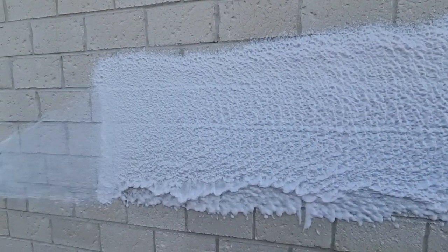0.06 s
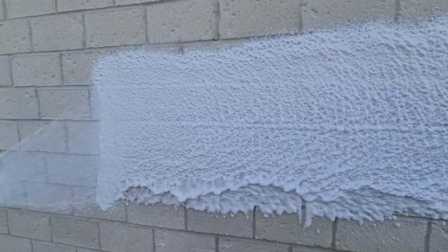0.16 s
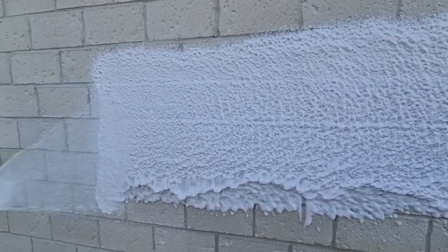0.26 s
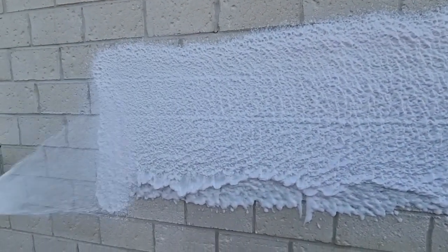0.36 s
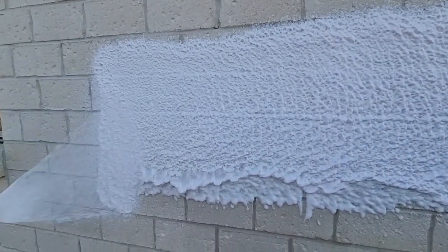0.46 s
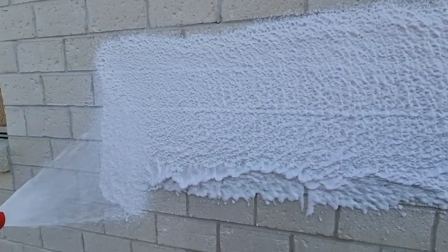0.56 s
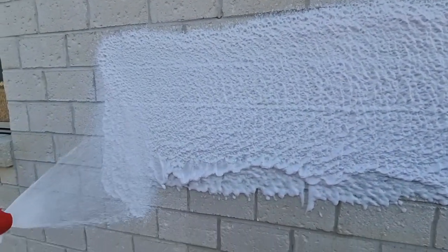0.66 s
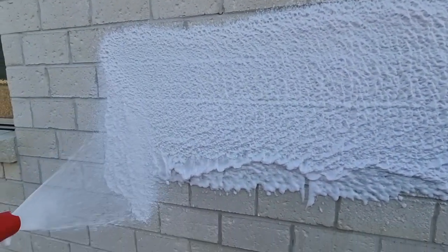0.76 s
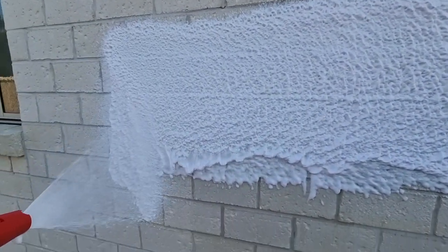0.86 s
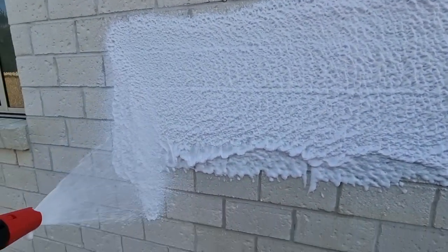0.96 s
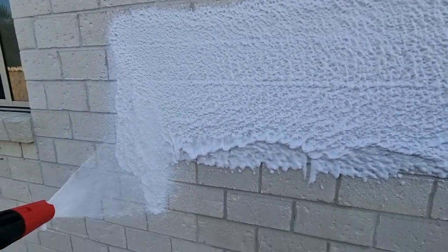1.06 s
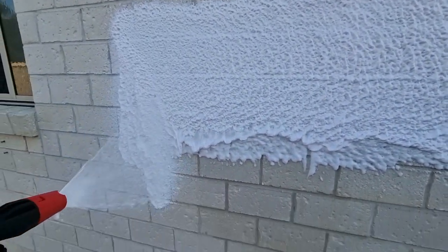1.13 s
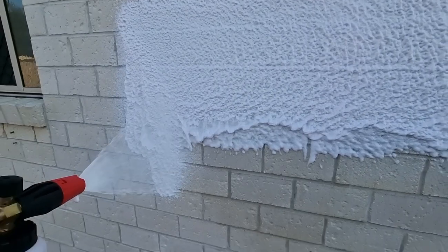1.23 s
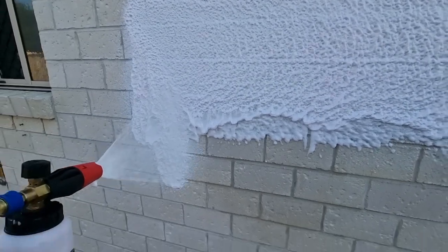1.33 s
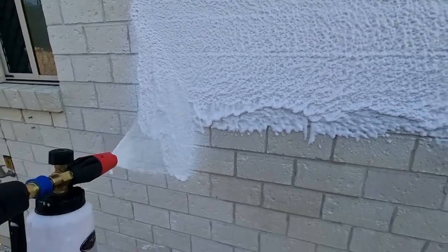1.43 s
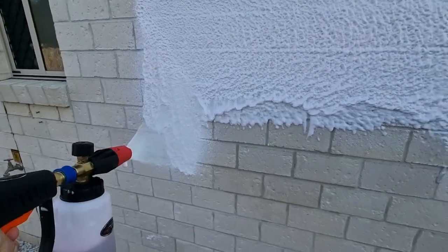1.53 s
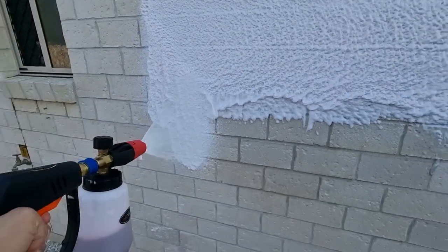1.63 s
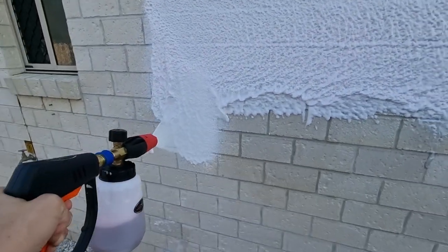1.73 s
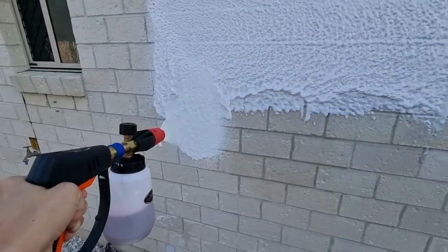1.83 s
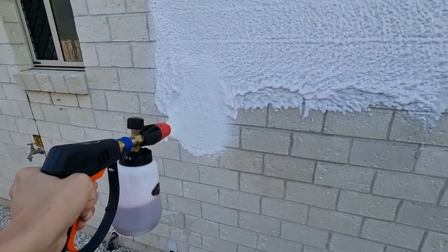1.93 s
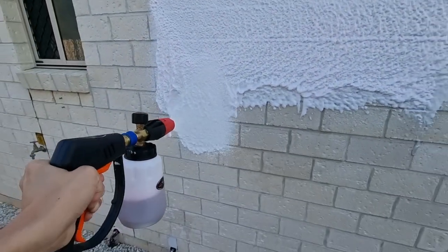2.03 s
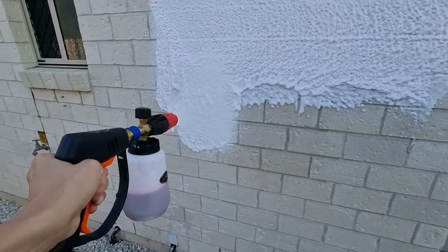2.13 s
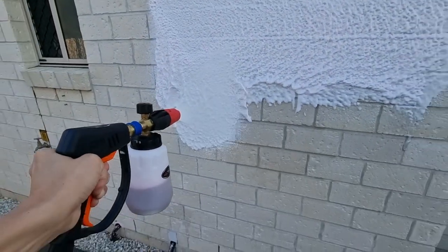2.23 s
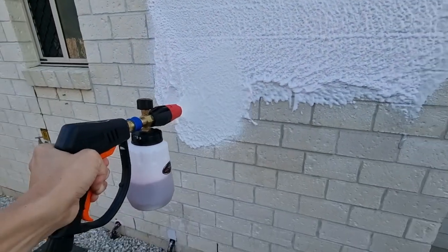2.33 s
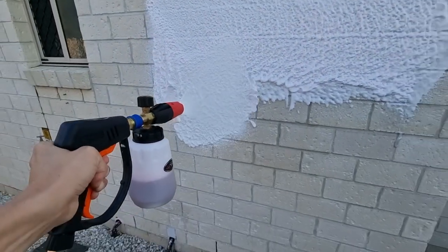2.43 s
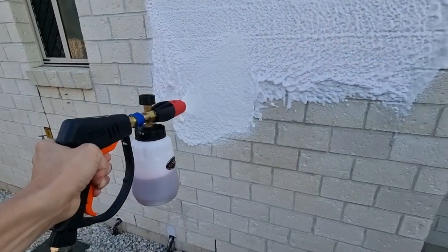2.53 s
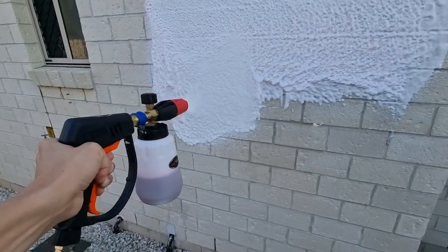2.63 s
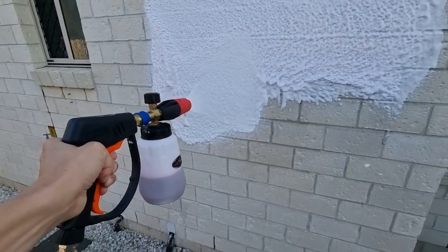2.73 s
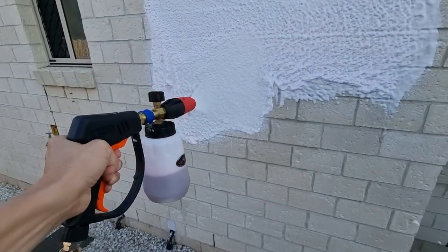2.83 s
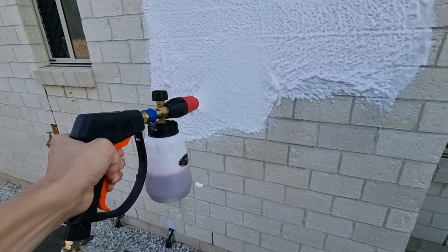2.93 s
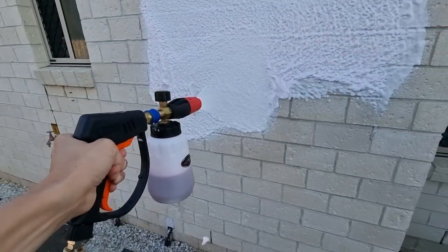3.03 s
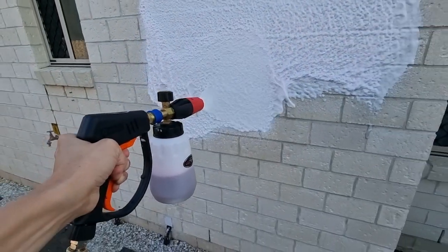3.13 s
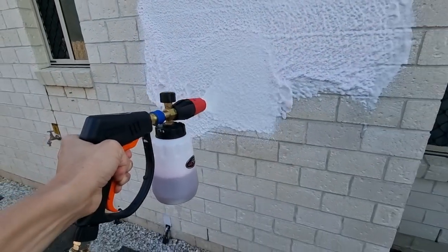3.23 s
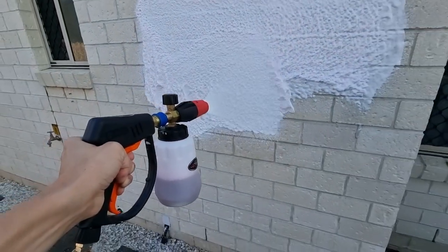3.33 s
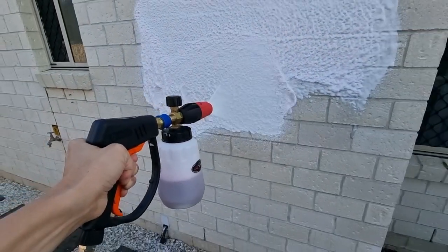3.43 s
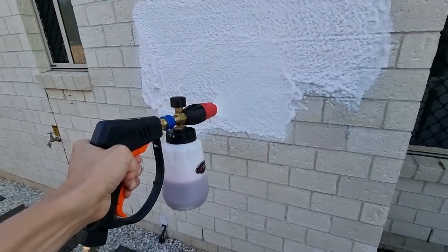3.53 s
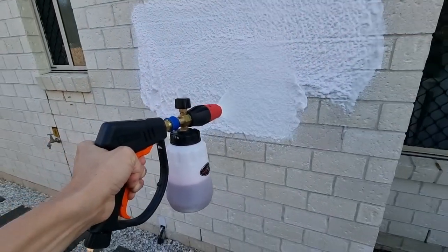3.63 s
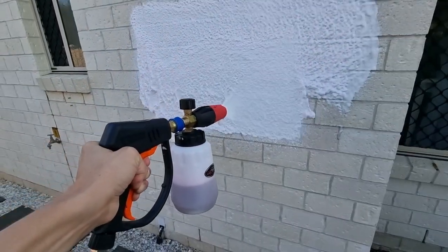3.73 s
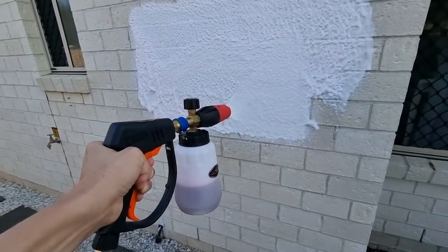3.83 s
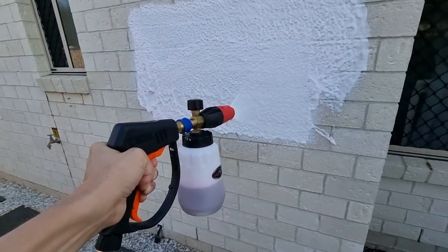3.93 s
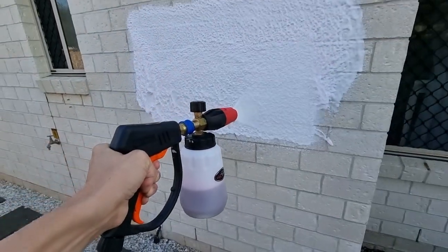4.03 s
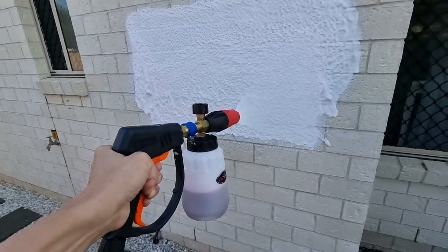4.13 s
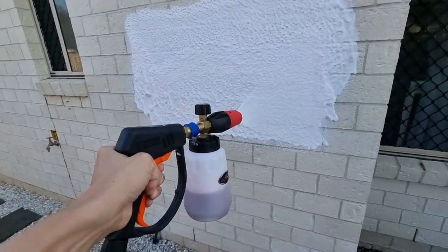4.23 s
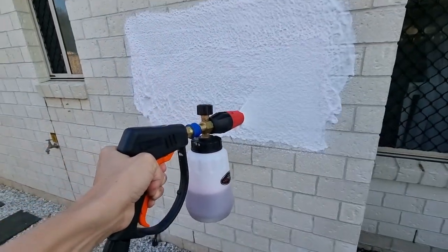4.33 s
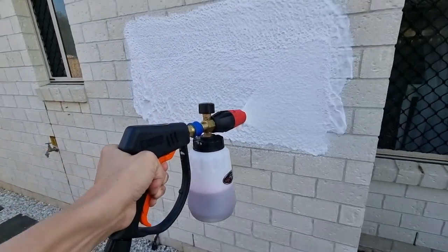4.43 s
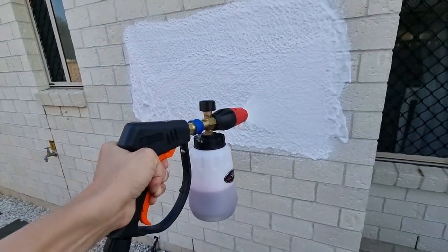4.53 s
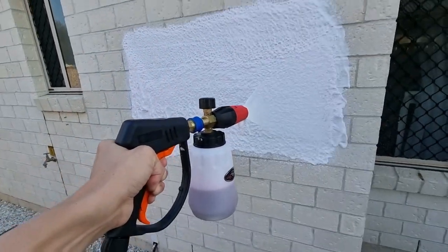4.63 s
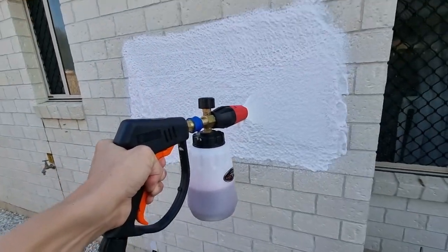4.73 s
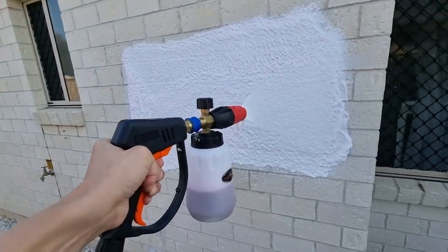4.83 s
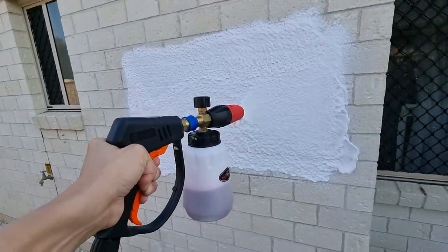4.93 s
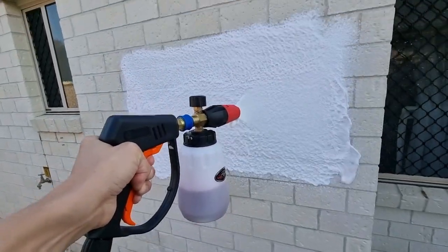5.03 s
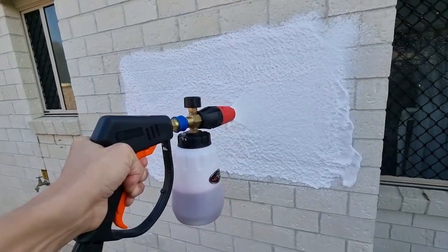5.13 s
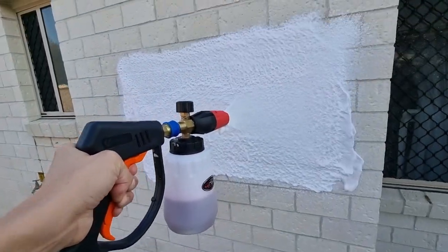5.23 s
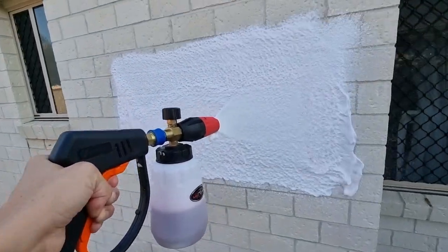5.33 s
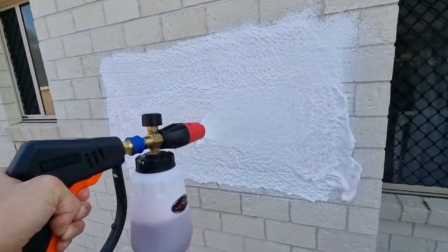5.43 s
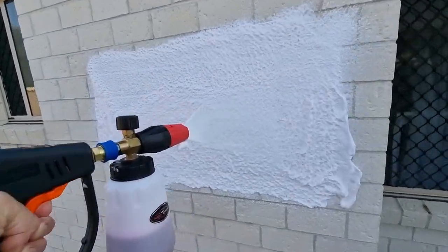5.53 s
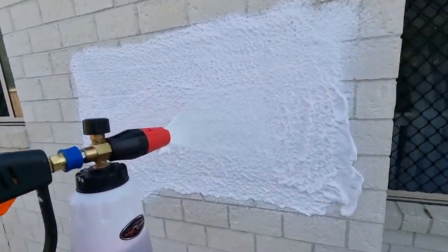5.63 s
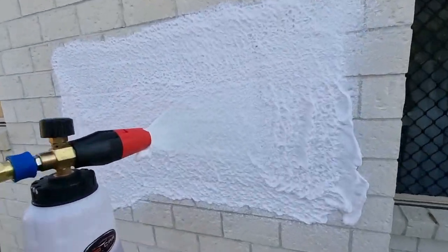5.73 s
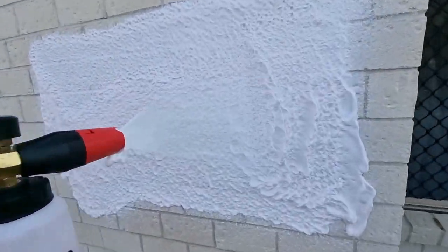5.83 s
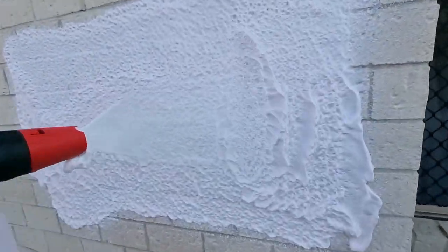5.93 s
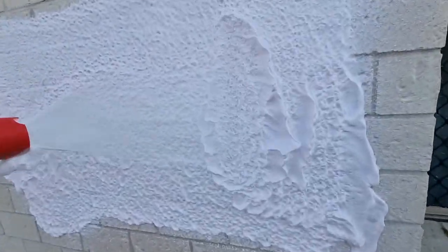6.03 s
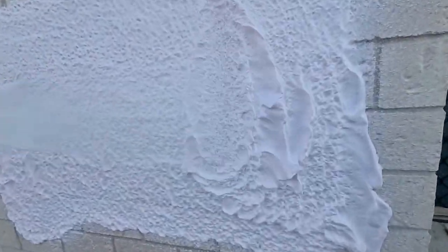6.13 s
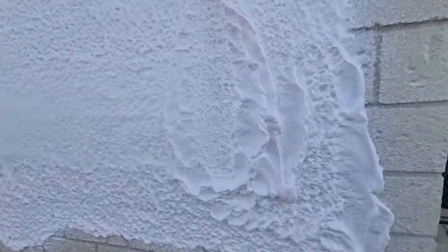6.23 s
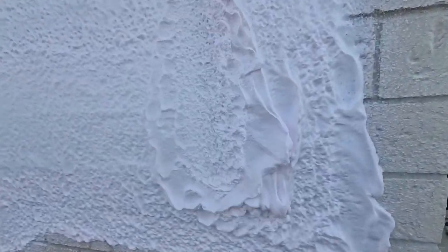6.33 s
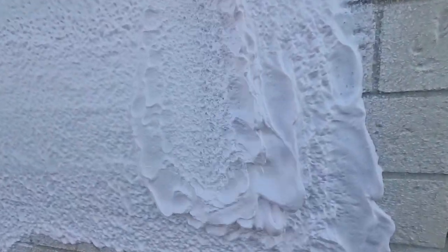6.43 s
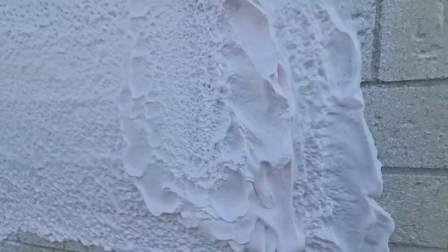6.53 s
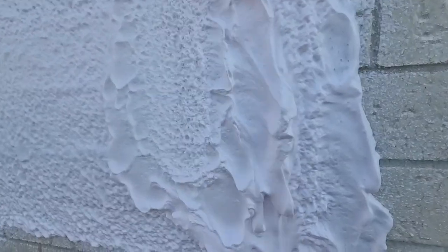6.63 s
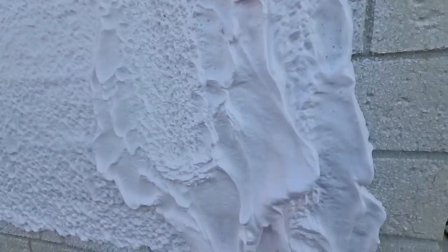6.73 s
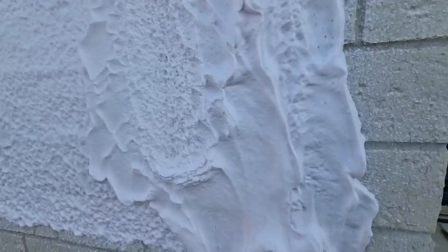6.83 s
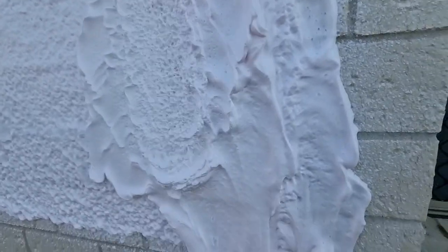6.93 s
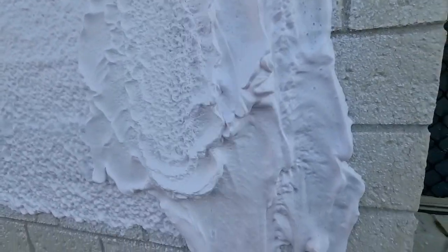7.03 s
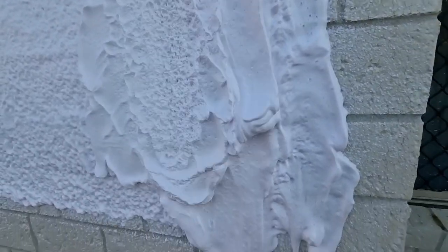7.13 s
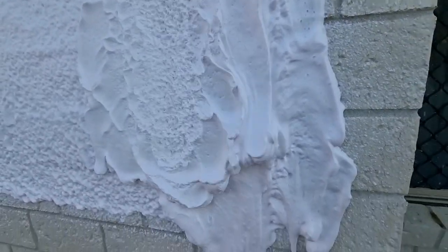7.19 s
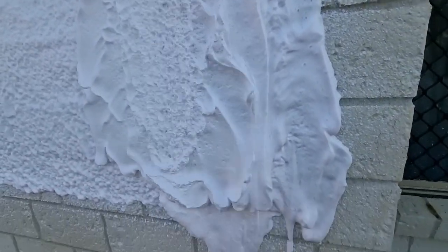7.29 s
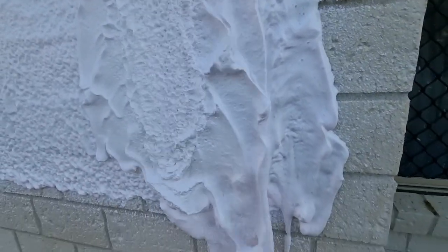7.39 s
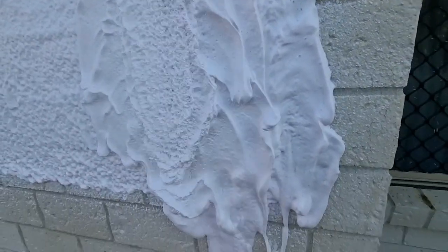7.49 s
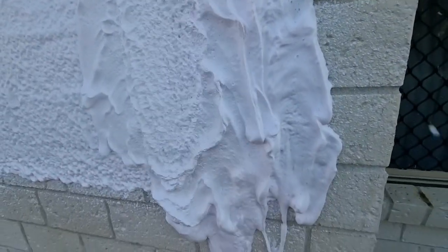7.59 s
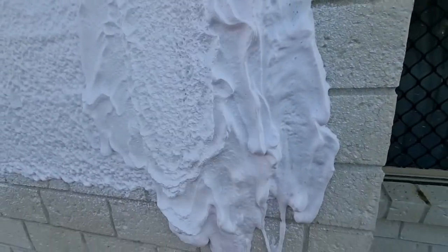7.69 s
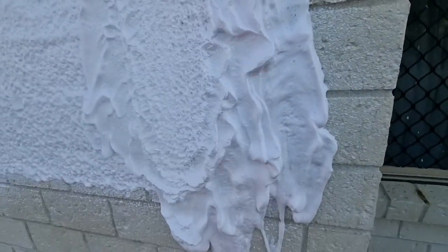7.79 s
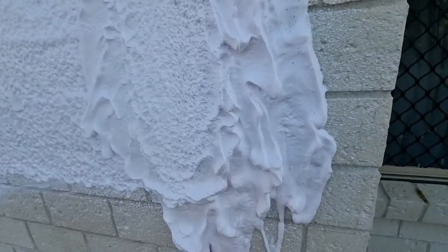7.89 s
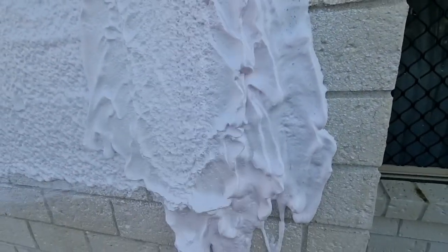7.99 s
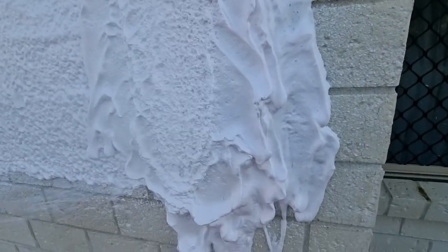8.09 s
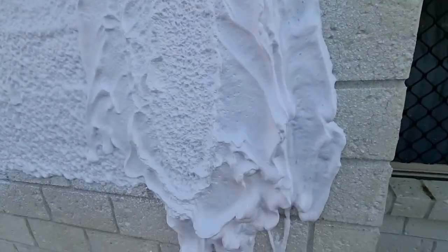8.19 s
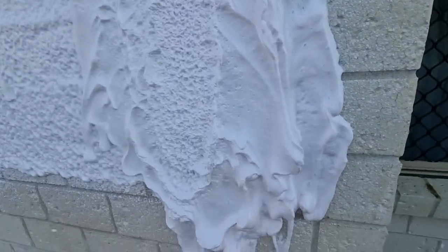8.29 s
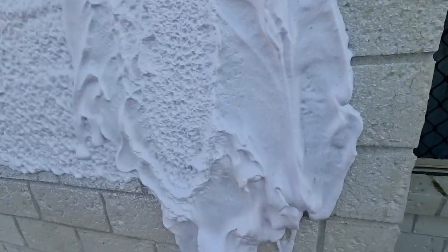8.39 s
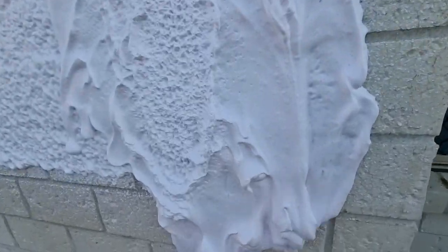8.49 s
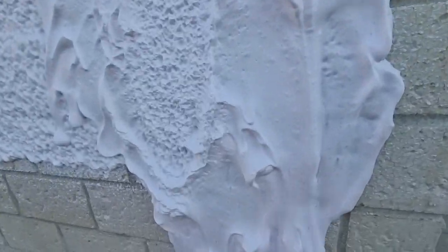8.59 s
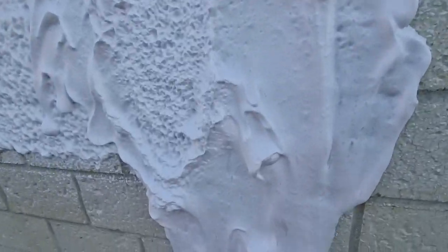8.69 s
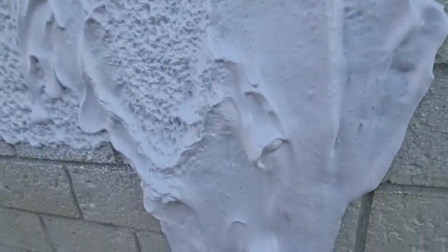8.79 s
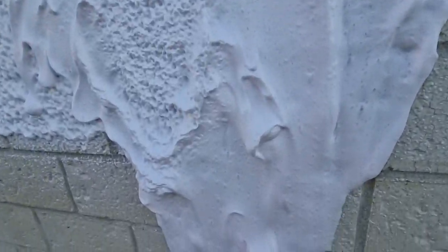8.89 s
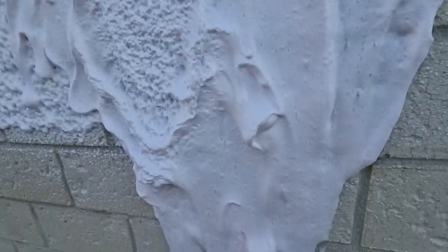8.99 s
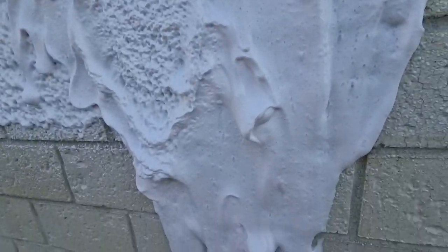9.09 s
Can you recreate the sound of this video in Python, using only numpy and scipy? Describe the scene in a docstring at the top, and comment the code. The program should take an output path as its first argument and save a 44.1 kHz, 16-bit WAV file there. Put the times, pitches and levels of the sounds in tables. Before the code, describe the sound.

The sound begins with spray already running: a loud, steady, broadband hiss, with a hollow midrange roar and fine wet spatter where foam strikes a brick wall. It leans left at first. From about 1 to 3 seconds the direction moves towards the centre and the tone shifts with the wall echo, becoming slightly softer and more diffuse until around 5.4. A low pump drone and faint high whine lie underneath. Between 5.5 and 6.5 the spray swells, closer, fuller and brighter, leaning left again, and stays strong. At about 8.3 it cuts off within a fraction of a second. A thin motor whine falls in pitch and fades over a low throbbing hum, with faint fizzing foam. Weak, airy whistles come and go from 8.4 to 9.1, and one light, dry tap sounds at 8.9, against a quiet outdoor background.

```python
"""A foam cannon sprays a brick wall outdoors: its nozzle hisses, and the foam roars and spatters on landing.
Spray is noise plus droplet impacts, shaped in a spectrogram and sent to two microphone ports with moving delays.
The gun swings past the camera, so direction and wall echo shift; an electric pressure pump drones beneath.
On release the spray stops and the motor whine, a sum of sines, falls over a low hum; thin whistles and one
light tap of decaying modes follow. Faint foam fizz and a yard of filtered noise lie behind."""
import sys
import numpy as np
from scipy import signal
from scipy.fft import rfft, irfft, next_fast_len
from scipy.io import wavfile
from scipy.ndimage import uniform_filter1d, map_coordinates

SR = 44100
rng = np.random.default_rng(int(sys.argv[2]) if len(sys.argv) > 2 else 0)


def master_out(mix):
    """Clip the mix to full scale and print it as 16-bit PCM to the path in sys.argv[1]."""
    frames = np.transpose(np.atleast_2d(mix))
    ceiling = np.clip(frames, -1, 1)
    pcm = np.round(ceiling * 32767).astype(np.int16)
    wavfile.write(sys.argv[1], SR, pcm)


N = 403515
T = np.arange(N) / SR  # time [s]

# Gun direction: (time [s], left-port lead of the wall impact [ms], of the nozzle [ms],
# diffuseness [exponent; more = less alike at the ports])
AIM = [(0, 0.39, 0.23, 0.81), (.5, 0.4, 0.2, .9), (1.1, .35, 0.14, 1.2), (2.1, 0.16, -0.014, 1.3),
       (3, .06, -0.089, 1.2), (4.5, 0.04, -0.17, 2), (5.4, 0.088, -0.12, 1.6), (5.9, 0.3, -0.018, 1.5),
       (6.4, 0.45, 0.13, 0.66), (6.9, 0.44, 0.18, 0.74), (8.25, 0.46, 0.14, 0.94)]
# The valve shuts: (time [s], flow [dB], nozzle hiss [dB])
RELEASE = [(8.268, -3.5, -3.8), (8.28, -9, -6), (8.3, -16.5, -15), (8.325, -25, -27), (8.36, -31.5, -39),
           (8.45, -37, -47), (8.7, -76, -85)]
# Nozzle hiss as it passes near or far from the microphone, before a trim: (time [s], level [dB])
NOZZLE_LEVEL = [(0.0, -23), (0.34, -25), (2.1, -24), (2.49, -27), (2.76, -25), (3.22, -27.5), (5.37, -26.5),
                (6.24, -18), (6.28, -19.5), (7.3, -20.5), (8.2, -21.5)]
# Fan of spray, swelling and fading as the gun turns, before a trim: (time [s], level [dB])
FAN_LEVEL = [(0, -19.5), (1.2, -18), (1.9, -19.5), (2.8, -21.5), (3.7, -22), (4.4, -20.5), (5.45, -22.5),
             (5.8, -17.5), (6.45, -16), (8.25, -19)]
# Foam landing on the wall, before a trim: (time [s], level [dB])
IMPACT_LEVEL = [(0, -20.5), (.45, -19), (1.35, -19.5), (2.1, -23), (5.25, -22), (5.7, -18.5), (6.2, -17),
                (8.2, -15)]
# Relative spectra of the four spray layers: (frequency [Hz], density [dB per Hz])
ROAR = [(60, -17.5), (150, -15), (250, -8.5), (380, -6), (500, -2.5), (650, 0.7), (820, 1.5), (1100, 0.4),
        (1400, -12), (1800, -19), (2500, -44)]
SPLASH = [(600, -30.5), (950, -2.5), (1200, 0), (1420, -1), (1700, -0.6), (2200, -4.5), (2800, -12),
          (5000, -50)]
RUSH = [(1200, -34), (2100, -4), (2750, -0.84), (3500, -1), (4300, -1.5), (5200, -5), (6600, -4),
        (8000, -8.5), (10000, -11.5), (13000, -24)]
HISS = [(4000, -36), (7500, -5.5), (9000, -7), (10200, -8), (11300, -0.5), (12400, 5.5), (13500, 2),
        (14500, 5.3), (15800, 2.5)]
# Likeness of the two ports, before the diffuseness exponent: (frequency [Hz], likeness [0-1])
ALIKE = [(200, 0.62), (500, 0.8), (900, 0.85), (1350, 0.9), (2000, 0.47), (3000, 0.43), (5000, 0.4),
         (9000, 0.22), (15000, 0.23)]
# Balance of the ports: (frequency [Hz], left minus right [dB])
LEFT_BALANCE = [(100, -5), (300, 6.5), (550, 6.5), (850, 2.5), (1300, 0.5), (5000, -2), (9000, 3.5),
                (12000, -2.5), (15000, -2)]
# The camera body shades the far port: (frequency [Hz], left minus right [dB per ms of lead])
SHADE = [(1500, 0), (2800, 11), (5000, 7), (12000, 4)]
# Low sound bends round the camera and takes longer: (frequency [Hz], factor on the lead [ratio])
BEND = [(200, 2.3), (420, 1.74), (600, 1.24), (900, 1.14), (1150, 0.97), (1500, 0.96), (1850, 1.07),
        (2300, 1.19), (3000, 1)]
# Resonances of the space between gun and wall:
# (time [s], low, middle, high centre [Hz], low, middle, high gain [dB])
HOLLOW = [(0, 540, 1356, 2400, 7, 7, -1), (.6, 550, 1330, 2600, 6, 5.5, 2.5),
          (1.2, 540, 1340, 2900, 6, 9, 3.5), (1.35, 750, 1370, 3050, 6, 9.5, 3.5),
          (1.8, 721, 1420, 3400, 7.5, 2.5, 1.5), (2.1, 740, 1160, 3500, 6, 2.5, 2),
          (2.7, 740, 1160, 2850, 3, 3, 2), (2.95, 890, 1250, 2850, 2.5, 4.5, 1),
          (4.45, 836, 1340, 2800, 3.5, 3, 3.5), (5.2, 772, 1350, 2850, 1.5, 0.5, 2.5),
          (5.5, 690, 1500, 3100, 4.5, 3, -0.5), (5.9, 610, 1410, 3500, 2, 4.5, 4),
          (6.3, 555, 1410, 3400, 7, 6, 2.5), (6.8, 570, 1330, 3100, 5, 3.5, 1.5),
          (7.6, 564, 1390, 2750, 5, 5, 1.5), (8.25, 530, 1280, 2750, 7, 4.5, 2)]
# Half widths of the low, middle and high resonance: (width [octaves])
HOLLOW_WIDTHS = [.11, 0.19, 0.25]
# Direct and reflected spray cancel: (time [s], centre [Hz], depth [dB])
NOTCH = [(0, 1950, -0.5), (1.2, 1890, 0.5), (2.1, 1820, 1), (3, 2000, 1), (5.3, 2200, 1), (6.2, 2350, 1),
         (6.7, 3100, 1), (8.25, 3500, 1)]
# The wall echo combs the spray; 1-2 ms is a path 0.3-0.7 m longer: (time [s], delay [ms], ripple [dB])
WALL_ECHO = [(0, 2.1, 1.5), (.7, 2.04, 2.2), (1.2, 1.8, 1.2), (1.6, 1.35, 2), (2.05, 1.13, 1),
             (2.5, 1, 1.5), (3, 1, 0.5), (4.8, 1.146, 0.5), (5.4, 1.3, 3), (5.9, 1.55, 0),
             (8.25, 1.43, 0.5)]
# Highest treble by the nozzle's angle to the camera: (time [s], gain [dB])
SHEEN = [(1, -0.5), (4.5, -1.5), (6.3, 0), (7, 4), (8.25, 2)]
# Reflection reaching the right port with the gun held out in front: (time [s], share [0-1])
FAR_PORT_ECHO = [(1.8, 0.087), (2.3, 0.85), (5.3, 0.97), (5.7, 0)]
# Pump drone: (multiple of stroke rate, level at first [dB], level after the step to the wall [dB])
PUMP = [(2, -63, -46.5), (3, -49.5, -44), (4, -41, -51), (6, -49.5, -45)]
# Start and end of the step towards the wall: (time [s])
STEP_S = [2.8, 7.3]
# Whine of the coasting motor, relative: (multiple of stroke rate, level [dB])
COAST_ORDERS = [(90, 4.5), (118, -8), (132, -8)]
# The motor housing colours the whine: (frequency [Hz], gain [dB])
HOUSING = [(2800, -21), (4000, -7), (4600, 6), (5100, -1), (5600, -2), (6100, -7), (6600, 8), (7400, -18)]
# Low hum: (time [s], level [dB])
HUM_LEVEL = [(0, -32), (.4, -37.5), (3.6, -37.5), (4.42, -44), (4.64, -33), (6.1, -37), (6.7, -36.5),
             (7.3, -41), (7.6, -37.5), (9, -33), (9.15, -41)]
# Tones beside the hum: (frequency [Hz], level relative to the main tone [dB])
HUM_SIDE_TONES = [(40, -12.5), (85, -9), (97, -17.5)]
# Whistles: (start [s], length [s], top pitch [Hz], level before the overtone gain [dB],
# pitch sag at the ends [Hz], breathiness as random pitch shift [Hz])
WHISTLES = [(8.37, .15, 2010, -55, 30, 5), (8.47, 0.18, 2020, -49.8, 8, 5),
            (8.44, 0.34, 1970, -59.5, 50, 71), (8.62, 0.13, 1990, -55, 25, 30),
            (8.72, .2, 1960, -60, 30, 70), (8.92, 0.12, 2240, -58, 30, 60), (9.04, .09, 2150, -60, 30, 70)]
# Fainter, higher squeals without overtones: same columns as the whistles
SQUEALS = [(8.62, .28, 4900, -64, 120, 190), (8.72, 0.13, 6700, -63, 40, 80),
           (8.93, .13, 4750, -67, 60, 160), (9.0, 0.12, 4330, -66, 40, 60)]
# Partials of the whistle: (multiple of pitch, gain [dB])
OVERTONES = [(1, 8), (2, -11), (3, -16)]
# Modes of the tap, relative: (frequency [Hz], level [dB], time to fall 60 dB [s])
TAP = [(1410, -22, .03), (1570, 1.7, .0055), (3300, 0, 0.0033), (4200, -5, .003)]
# Tap direct, off the ground, off the wall: (delay [s], level [dB])
TAP_PATHS = [(0, 0), (.0072, -14), (.017, -18)]
# Relative spectrum of settling foam: (frequency [Hz], density [dB per Hz])
FIZZ = [(1500, -19), (3000, -4), (4800, 3), (6700, -2), (7500, -9), (11000, -15), (15800, -16)]
# Relative spectrum of the yard: (frequency [Hz], density [dB per Hz])
YARD = [(20, -26), (40, -2.5), (65, -0.5), (95, -1), (130, -7.5), (250, -14.5), (500, -17), (800, -19),
        (1050, -26.5), (1400, -24.5), (3300, -36), (4000, -39), (4700, -32), (5700, -35), (6650, -35),
        (7300, -42), (11000, -53), (15800, -59)]

ROAR_DB, ROAR_FOLLOWS = -20, 0.93  # roar at the mean impact level; dB of roar per dB of impact
TWIST_HZ, TWIST_WIDTH_HZ = 1550, 310  # where the far-port reflection turns the phase round
PUMP_HZ = 73.82  # stroke rate under load, before slight wander
WHINE_ORDER, LOADED_WHINE_DB = 90, -49.5  # multiple of the stroke rate; level before the port balance
SHUT_S, HALF_SPEED_S = 8.32, .55  # start of coasting; time to lose half the speed
WHINE_DB, WHINE_FADE_DB_PER_S = -56, 14  # coasting whine, before the levels of its orders
WHINE_SMEAR = 2.1  # flutter of the coasting whine relative to its clean core
HUM_HZ, THROB_DB, THROB_PER_S = 73, 1.5, 11  # mean pitch; random throb depth and pace
FIZZ_DB, FIZZ_FADE_DB_PER_S = -49, 17
TOP_HZ = 15850  # upper band limit


def spray():
    """Nozzle turbulence hisses and foam strikes the wall, all on one slightly sputtering flow."""
    (hiss_db,), (rush_db,), (impact_db,) = curves(NOZZLE_LEVEL), curves(FAN_LEVEL), curves(IMPACT_LEVEL)
    wall_ms, nozzle_ms, _ = curves(AIM)
    roar_db = ROAR_DB + ROAR_FOLLOWS * (impact_db - impact_db.mean())
    roar = stream(ROAR, wall_ms, drops=0.45, rate=900, patchy_db=1.12)
    roar = amp(roar_db + 0.32 * wobble(3.94)) * roar
    splash = amp(impact_db + 0.38) * stream(SPLASH, wall_ms, drops=0.43, rate=700, patchy_db=1.4)
    rush = stream(RUSH, nozzle_ms, drops=0.4, rate=2500, patchy_db=1.52)
    rush = amp(rush_db + 1.97 + 0.36 * wobble(14)) * rush
    hiss = stream(HISS, nozzle_ms, drops=0.8, rate=5000, patchy_db=1.0)
    hiss = amp(hiss_db + 8.5 + 0.59 * wobble(26)) * hiss
    sputter_db = .3 * wobble(18) + .35 * wobble(140)
    flow_db, nozzle_db = curves(RELEASE)
    return amp(sputter_db) * (amp(flow_db) * (roar + splash + rush) + amp(nozzle_db) * hiss)


def stream(spectrum, lead_ms, drops, rate, patchy_db):
    """Turbulence and droplets, coloured by the hollow before the wall, reach two ports; rms 1."""
    source = rng.standard_normal((2, N)) + drops * droplets(rate, spread_db=6.5)
    hz, t, z = signal.stft(source, SR, nperseg=1024)
    hz = hz[:, None]
    colour = amp(along(spectrum, hz) + hollow(hz, t))
    # Random level patches, smoothed over 5 frequency bins and 14 frames
    patches = uniform_filter1d(rng.standard_normal(z.shape[1:]), size=5, axis=0)
    patches = uniform_filter1d(patches, size=14, axis=1)
    # Each frame is normalised, so the moving resonances change colour and not loudness
    z = z * colour / np.linalg.norm(colour, axis=0) * amp(patchy_db * unit(patches))
    diffuseness = curves(AIM, t)[2]
    # Mixing two independent noises at this angle gives the wanted likeness
    angle = np.arccos(along(ALIKE, hz) ** diffuseness) / 2
    shared, apart = np.cos(angle) * z[0], np.sin(angle) * z[1]
    lead = np.interp(t, T, lead_ms)
    lead_s = along(BEND, hz) * lead / 1000
    balance_db = along(LEFT_BALANCE, hz) + along(SHADE, hz) * lead
    # Half the level and time difference goes to each port
    port = amp(balance_db / 2) * np.exp(1j * np.pi * hz * lead_s)
    left = (shared + apart) * port
    right = (shared - apart) / port * twist(hz, t)
    return unit(signal.istft(np.array([left, right]), SR)[1][:, :N])


def droplets(rate, spread_db):
    """Two trains of tiny random impacts per second of uneven size, rms 1."""
    hits = rng.random((2, N)) < rate / SR
    sizes = amp(2 * spread_db * rng.random((2, N)))
    return unit(hits * rng.standard_normal((2, N)) * sizes)


def hollow(hz, t, dip_db=3.5, dip_octaves=0.68, ripple_hz=2800):
    """Gain in dB of moving resonances, two cancellations, the nozzle's sheen and the wall-echo comb."""
    def bump(centre, width):
        return np.exp(-.5 * (np.log2((hz + 1) / centre) / width) ** 2)

    centres, gains_db = np.split(np.array(curves(HOLLOW, t)), 2)
    peaks = sum(db * bump(centre, width) for centre, db, width in zip(centres, gains_db, HOLLOW_WIDTHS))
    dip = dip_db * bump(centres[0] / 2 ** dip_octaves, 0.27)  # below the low resonance
    notch_hz, notch_db = curves(NOTCH, t)
    notch = notch_db * bump(notch_hz, 0.13)
    sheen = curves(SHEEN, t)[0] * bump(15200, 0.19)
    echo_ms, ripple_db = curves(WALL_ECHO, t)
    echo_s = echo_ms / 1000
    comb = ripple_db * bump(ripple_hz, 1.8) * np.cos(2 * np.pi * hz * echo_s)
    return peaks + sheen - dip - notch + comb


def twist(hz, t):
    """Phase turn that the reflection gives the right port, as a share of an all-pass response."""
    share = curves(FAR_PORT_ECHO, t)[0]
    turned = np.exp(-2j * np.arctan2(hz * TWIST_WIDTH_HZ, TWIST_HZ ** 2 - hz ** 2))
    return np.exp(1j * np.angle(1 - share + share * turned))  # phase only, level kept


def pump():
    """Piston strokes drone under load; unloaded, the motor coasts against drag and its whine falls and fades."""
    coast_s = np.maximum(T - SHUT_S, 0)
    stroke_hz = PUMP_HZ / (1 + coast_s / HALF_SPEED_S)
    phase = turns(stroke_hz * (1 + 0.000508 * wobble(5)))

    def stroke_tone(order, first_db, later_db):
        level = amp(np.interp(T, STEP_S, [first_db, later_db]) + 2.4 * wobble(5))
        return level * np.sin(order * phase + rng.uniform(0, 2 * np.pi))

    def smear():
        flutter = np.array([wobble(120) + .8 * wobble(650) for _ in range(2)])
        return unit(amp(2.4 * wobble(34)) * (1 + WHINE_SMEAR * flutter))

    drone = sum(stroke_tone(*row) for row in PUMP)
    whine = amp(LOADED_WHINE_DB + 1.8 * wobble(3.2)) * np.sin(WHINE_ORDER * phase)
    loaded = np.sqrt(2) * (drone + whine) * amp([[1.5], [-1.5]])  # left port louder
    coasting = sum(amp(db + along(HOUSING, order * stroke_hz)) * smear() * np.sin(order * phase)
                   for order, db in COAST_ORDERS)
    coasting = amp(WHINE_DB - WHINE_FADE_DB_PER_S * coast_s) * np.sqrt(2) * coasting
    load = amp(curves(RELEASE)[0])
    return load * loaded + (1 - load) * coasting


def hum():
    """A low hum throbs and wavers, beating with weaker tones beside it and a narrow noise band."""
    def tone(hz):
        return np.sqrt(2) * np.sin(turns(hz + 1.44 * wobble(14)))

    tones = tone(HUM_HZ) + sum(amp(db + 4.6 * wobble(1.4)) * tone(hz) for hz, db in HUM_SIDE_TONES)
    band_shape = [(40, -31), (62, 9.5), (76, 5), (90, 8), (125, -44.0)]  # (frequency [Hz], gain [dB])
    band = unit(coloured(rng.standard_normal(N), band_shape))
    throbbing = amp(THROB_DB * wobble(THROB_PER_S)) * (tones + 0.46 * band)
    return amp(curves(HUM_LEVEL)[0]) * unit(throbbing)


def whistle(rows, overtones):
    """Thin, airy tones swell and fade unevenly while their pitch arches and flutters."""
    out = np.zeros((2, N))
    for start, length, hz, db, sag_hz, breath_hz in rows:
        span = (T > start) & (T < start + length)
        t = T[span]
        arch = np.sin(np.pi * (t - start) / length)
        phase = turns(hz - sag_hz * (1 - arch) + breath_hz * wobble(260, t))
        flutter = 1 + 0.4 * np.array([wobble(260, t), wobble(260, t)])
        tone = sum(amp(level + 2.2 * wobble(36, t)) * np.sin(k * phase) for k, level in overtones)
        out[:, span] += amp(db) * arch * tone * flutter
    return out


def tap(at=8.8976, db=-13, attack_s=0.001):
    """One light, dry tap of decaying modes, answered by the ground and the wall."""
    def ring(start):
        t = np.maximum(T - start, 0)
        modes = sum(amp(level - 60 * t / t60) * np.sin(2 * np.pi * hz * t) for hz, level, t60 in TAP)
        return modes * (1 - np.exp(-t / attack_s))

    def at_port(lag):
        return sum(amp(path_db) * ring(at + lag + delay) for delay, path_db in TAP_PATHS)

    return amp(db) * np.array([at_port(0), at_port(.00005)])  # right port 0.05 ms later


def fizz():
    """Tiny bubble bursts of fresh foam fizz faintly, fading as it settles after the valve shuts."""
    bubbles = unit(coloured(droplets(rate=4800, spread_db=3), FIZZ))
    return amp(FIZZ_DB - FIZZ_FADE_DB_PER_S * np.maximum(T - SHUT_S, 0)) * bubbles


def yard():
    """Outdoor background as coloured noise, nearly mono in the bass, sinking slightly at the end."""
    mid, side = coloured(rng.standard_normal((2, N)), YARD)
    side = coloured(side, [(60, -7.0), (200, -10), (700, 6.5)])  # (frequency [Hz], gain [dB])
    fade_db = np.interp(T, [8.6, 9.15], [0, -3.5])
    return amp(-39.0 + fade_db + 1.7 * wobble(5.4)) * unit(np.array([mid + side, mid - side]))


def amp(db):
    """Decibels to amplitude ratio."""
    return 10 ** (np.asarray(db) / 20)


def unit(x):
    """Scale to rms 1 over all ports together."""
    return x / np.sqrt(np.mean(x ** 2) + 1e-20)


def along(points, hz):
    """Read (frequency [Hz], value) points on a log frequency axis."""
    f, v = np.transpose(points)
    return np.interp(np.log(hz + 1), np.log(f + 1), v)


def curves(rows, t=T):
    """Each column after the time, read at times t."""
    s, *cols = np.transpose(rows)
    return [np.interp(t, s, c) for c in cols]


def wobble(rate, t=T):
    """A smooth random curve at times t, rate knots a second."""
    return map_coordinates(rng.standard_normal(int(N * rate / SR) + 4), [t * rate])


def filtered(x, response):
    """Multiply the spectrum of x by a response of frequency."""
    size = next_fast_len(N + 8192)  # padding limits wrap-around
    return irfft(rfft(x, size) * response(np.fft.rfftfreq(size, 1 / SR)), size)[..., :N]


def coloured(x, points):
    """Filter x by (frequency [Hz], gain [dB]) points."""
    return filtered(x, lambda hz: amp(along(points, hz)))


def turns(hz):
    """Running phase in radians of a changing frequency."""
    return 2 * np.pi * np.cumsum(hz) / SR


def scene():
    """All sources at the two microphone ports, from the spray back to the yard."""
    whistles = whistle(WHISTLES, OVERTONES) + whistle(SQUEALS, OVERTONES[:1])
    return spray() + pump() + hum() + whistles + tap() + fizz() + yard()


def record(dry):
    """The camera rounds off the highest peaks, then cuts steeply above its band limit."""
    rounded = dry / (1 + np.abs(dry / .9) ** 10) ** .1
    return filtered(rounded, lambda hz: 1 / (1 + (hz / TOP_HZ) ** 400))


dry = scene()
out = record(dry)
master_out(out)
```